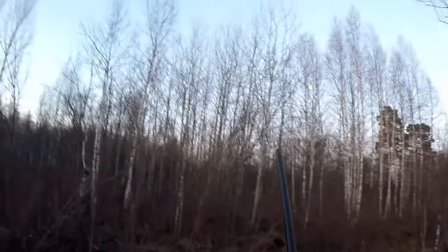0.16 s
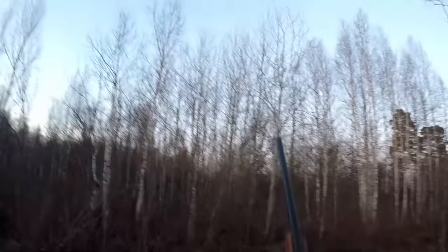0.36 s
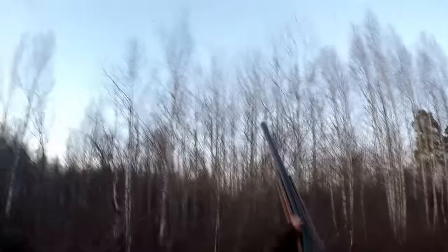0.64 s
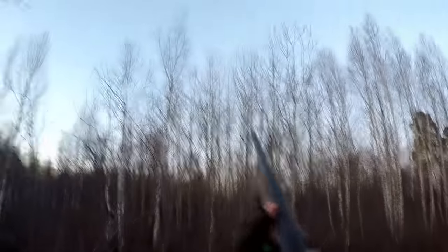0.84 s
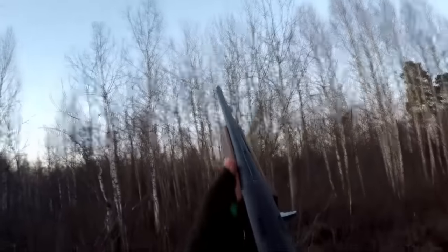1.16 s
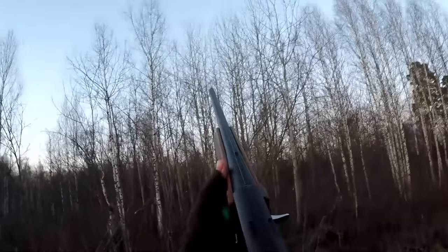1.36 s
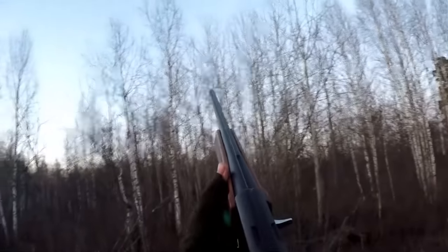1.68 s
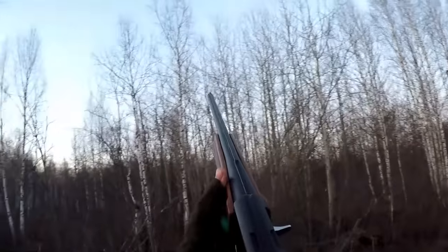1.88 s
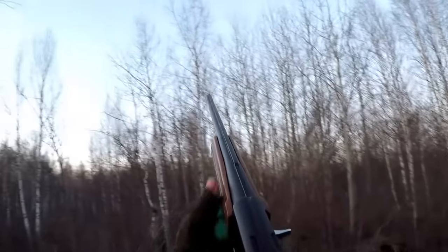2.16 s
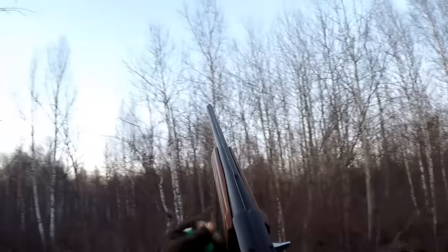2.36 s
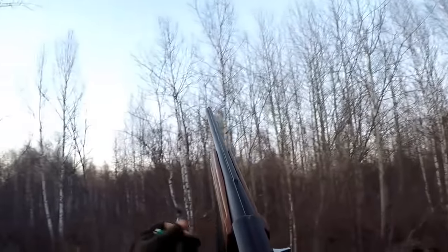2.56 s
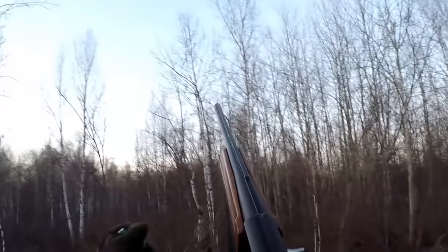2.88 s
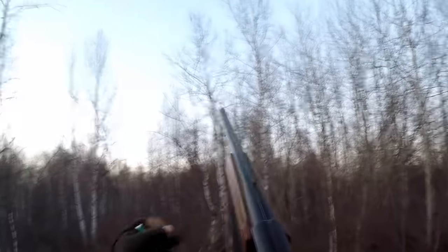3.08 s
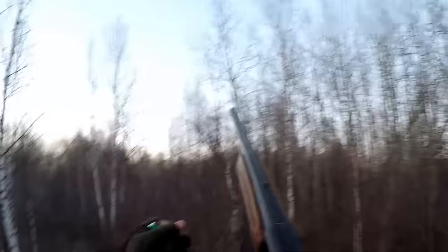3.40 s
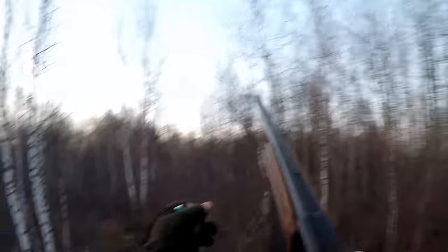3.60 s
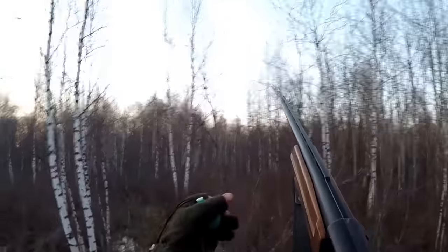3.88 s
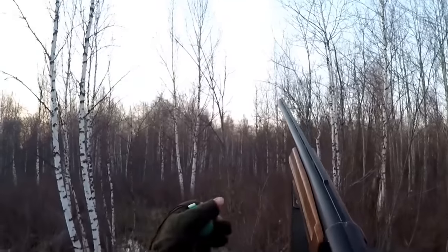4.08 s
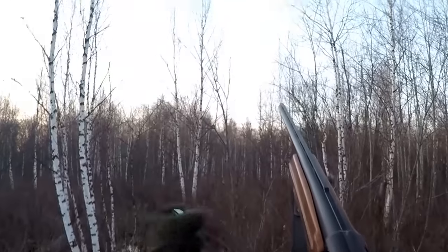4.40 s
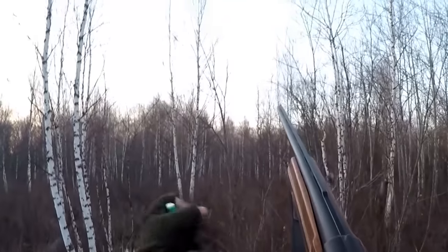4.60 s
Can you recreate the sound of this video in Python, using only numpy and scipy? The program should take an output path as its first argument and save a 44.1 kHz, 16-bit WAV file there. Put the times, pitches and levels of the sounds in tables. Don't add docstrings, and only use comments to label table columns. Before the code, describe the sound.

Close, body-worn microphone in an open birch wood at dusk. A hand-held caller stutters and squeaks downward right away, then a sleeve rustles, wooden stock knocks cluster, and small parts click. After a quieter stretch the caller gives two piercing rise-then-fall squeaks with airy hiss. A faint distant bird whistles and ticks over soft wind rumble.

```python
import sys
import numpy as np
from scipy import signal
from scipy.fft import rfft, irfft
from scipy.io import wavfile
from scipy.ndimage import uniform_filter1d

SR = 44100
rng = np.random.default_rng(int(sys.argv[2]) if len(sys.argv) > 2 else 0)


def store_wav(level_fs):
    pcm = np.round(np.clip(np.atleast_2d(level_fs), -1, 1) * 32767)
    wavfile.write(sys.argv[1], SR, pcm.T.astype(np.int16))


def attenuation_scalar(level_db):
    decades = np.asarray(level_db, float) / 20
    return 10 ** decades


N = 209430


def evened(x):
    return x / np.sqrt(np.mean(x ** 2) + 1e-20)


def add(mix, start_s, sound):
    part = mix[round(start_s * SR):][:len(sound)]
    part += sound[:len(part)]


def resonate(x, hz, width_hz):
    turn = np.exp(2j * np.pi * np.cumsum(hz * np.ones(len(x))) / SR)
    r = np.exp(-np.pi * width_hz / SR)
    return 2 * (turn * signal.lfilter([1 - r], [1, -r], x / turn)).real


def resonate_twice(x, hz, width_hz):
    return resonate(resonate(x, hz, width_hz), hz, width_hz)


def coloured(x, points, keep=False):
    f, db = np.transpose(points)
    hz = np.fft.rfftfreq(len(x), 1 / SR)
    gain = attenuation_scalar(np.interp(np.log(hz + 1), np.log(f + 1), db))
    out = irfft(rfft(x) * gain, len(x))
    return out if keep else evened(out)


def flutter(size, depth_db):
    wander = uniform_filter1d(uniform_filter1d(rng.standard_normal(N), size), size)
    return attenuation_scalar(depth_db * evened(wander))


def columns(rows):
    s, *cols = np.transpose(rows)
    t = np.arange(s[0], s[-1], 1 / SR)
    return s[0], [uniform_filter1d(np.interp(t, s, c), size=15, mode="nearest") for c in cols]


def along(points, hz):
    f, db = np.transpose(points)
    return np.interp(np.log(hz), np.log(f), db)


# f/Hz of fundamental, level/dB
THIRD_HARMONIC = [(1700, -30), (2200, -12), (2480, -1), (2630, -6), (2760, -13), (2900, -17), (3250, -24),
                  (4300, -29), (4700, -33), (5100, -40)]


def sweep(rows, second=None, over_db=0, top_db=0):
    s, (hz, db) = columns(rows)
    levels_db = [db]
    if second:
        third_db = db + along(THIRD_HARMONIC, hz)
        levels_db += [db + over_db + along(second, hz)]
        levels_db += [third_db + step_db for step_db in (0, -8, -7, -12)]
    turn = 2 * np.pi * np.cumsum(hz) / SR
    tone = np.zeros(len(hz))
    for k, level_db in enumerate(levels_db, 1):
        lift_db = top_db * np.clip((k * hz - 11800) / 2200, 0, 1)
        ceiling = np.clip((15400 - k * hz) / 500, 0, 1)
        tone += attenuation_scalar(level_db + lift_db) * np.sin(k * turn) * ceiling
    beat = 2 * np.pi * 3950 * np.arange(len(hz)) / SR
    below = attenuation_scalar(-21) * np.sin(turn - beat) + attenuation_scalar(-42) * np.sin(turn - 2 * beat)
    above = attenuation_scalar(-34) * np.sin(turn + beat) * np.clip((12150 - hz) / 300, 0, 1)
    skirt = attenuation_scalar(-29) * np.sin(turn) * evened(uniform_filter1d(rng.standard_normal(len(hz)), size=6))
    tone += attenuation_scalar(db) * (below + above + skirt) * np.clip((hz - 8500) / 2000, 0, 1)
    return s, np.sqrt(2) * tone * signal.windows.tukey(len(hz), 60 / len(hz))


def pips(rows):
    out = np.zeros(N)
    for s, length_s, from_hz, to_hz, db in rows:
        hz = np.geomspace(from_hz, to_hz, round(length_s * SR))
        tone = np.sqrt(2) * np.sin(2 * np.pi * np.cumsum(hz) / SR)
        add(out, s, attenuation_scalar(db) * tone * signal.windows.tukey(len(hz), .6))
    return out


# f/Hz, level/dB per Hz
FLOOR_SPECTRUM = [(12, -28.5), (20, 1.5), (118, -17), (136, -20), (206, -19.5), (257, -22.5), (448, -23.5),
                  (698, -26), (2060, -29.5), (2240, -29.5), (4010, -29.5), (15200, -44)]
# t/s, level/dB
WIND = [(0.0, -61), (0.33, -63), (0.48, -56), (0.75, -50), (0.85, -53), (1.48, -64), (1.81, -60.5),
        (2.01, -63), (2.34, -60.5), (2.68, -65), (2.97, -55), (3.09, -62), (3.53, -61), (3.91, -70.5),
        (4.1, -65.5), (4.31, -57), (4.75, -61.5)]


def air():
    floor = coloured(rng.standard_normal(N), FLOOR_SPECTRUM + [(15500, -76.0)])
    floor *= attenuation_scalar(-60.5) * flutter(size=900, depth_db=0.9)
    s, db = np.transpose(WIND)
    gusts = coloured(rng.standard_normal(N), [(15, 0), (40, -1.5), (100, -8), (220, -18.5), (600, -46.5)])
    gusts *= attenuation_scalar(np.interp(np.arange(N) / SR, s, db) - 1.0) * flutter(size=1500, depth_db=3.0)
    return floor + gusts


def woods(x):
    t = np.arange(round(.4 * SR)) / SR
    bright = signal.lfilter([1, -.6], [1], rng.standard_normal(len(t)))
    tail = bright * attenuation_scalar(-60 * t / .5) * (t > .004)
    return signal.oaconvolve(x, tail / np.linalg.norm(tail))[:N]


# t/s, length/s, from f/Hz, to f/Hz, level/dB
WHISTLES = [(.394, .011, 4500, 7200, -61), (.461, .015, 9000, 3700, -62), (.892, .012, 6500, 6000, -63),
            (2.026, .014, 5800, 7600, -70), (2.022, .012, 4300, 5300, -70), (3.918, .015, 4300, 7000, -65),
            (3.990, .013, 6800, 4200, -66), (1.808, .006, 4000, 4000, -65)]
# t/s, f/Hz, level/dB
ARCH = [(.06, 3450, -64), (.07, 3750, -52), (.078, 4050, -49), (.084, 4280, -48), (.092, 4050, -49),
        (.098, 3750, -50), (.103, 3300, -60)]
# t/s, relative level/dB, f/Hz
TICKS = [(1.1234, -59, 3620), (1.2994, -63, 4020), (1.5474, -61, 3620), (1.5754, -62, 3840),
         (1.7894, -59, 3850), (1.8744, -58, 3830), (2.2904, -61, 3790), (2.6584, -63, 3770),
         (3.3094, -60, 3820), (3.3914, -61, 3740), (3.4074, -61, 4000), (3.5144, -60, 3940),
         (3.5264, -60, 3910), (3.7094, -60, 4470), (3.7974, -60, 3630), (3.8921, -58, 3700),
         (3.9404, -62, 3800), (4.0304, -63, 3690), (4.1324, -62, 3690), (4.2334, -61, 3940)]


def far_bird():
    ticks = [(s, .011, .96 * hz, 1.04 * hz, db - 10) for s, db, hz in TICKS]
    out = pips(list(WHISTLES) + ticks)
    add(out, *sweep(ARCH))
    return out


# t/s, level/dB
RUSTLE = [(0.0, -61.5), (0.35, -68.5), (0.48, -56), (0.87, -58.5), (1.12, -66.5), (1.27, -80), (2.03, -69),
          (2.26, -73), (2.6, -84.5)]
# f/Hz, level/dB per Hz
CLOTH = [(88, -37.5), (150, -6.5), (347, 2), (1040, -5), (1260, -4.5), (1460, -6.5), (5480, -22),
         (9000, -32), (11700, -62), (19800, -120)]
# t/s, length/s, f/Hz,
# width/Hz, level/dB
NOISE_BANDS = [(.828, .022, 1250, 250, -57), (.915, .04, 1300, 400, -58), (.942, .062, 1220, 380, -53),
               (1.015, .03, 1170, 300, -60), (1.045, .025, 1150, 300, -61), (1.10, .03, 1150, 200, -65),
               (.55, .25, 1280, 250, -63), (.835, .04, 5800, 900, -63), (2.05, .08, 6100, 1500, -62),
               (2.05, .078, 13200, 1500, -76), (2.085, .08, 1000, 1800, -58), (3.68, .03, 1150, 400, -68),
               (.122, .016, 2500, 700, -52), (4.512, .022, 2400, 500, -48), (4.245, .03, 2500, 2000, -64),
               (0, .1, 280, 150, -54), (.098, .03, 9000, 7000, -48), (4.495, .025, 11000, 7000, -47),
               (2.99, .026, 11000, 7000, -48), (.22, .1, 7600, 1800, -60), (.21, .13, 6000, 1500, -53),
               (.29, .08, 14000, 2500, -65), (.16, .06, 14000, 2500, -68), (.308, .018, 2800, 2500, -56),
               (.35, .14, 3500, 4500, -59), (.748, .02, 250, 350, -46), (2.815, .13, 12200, 1000, -60),
               (4.315, .12, 12300, 1100, -57), (2.96, .07, 10500, 5000, -56), (4.46, .08, 13000, 5000, -58),
               (2.795, .04, 14800, 1800, -58), (4.29, .03, 14800, 1800, -54), (2.964, .025, 15300, 900, -58),
               (2.13, .035, 800, 900, -61), (2.133, .007, 3150, 500, -40), (3.0, .05, 12000, 5000, -56),
               (4.51, .05, 12500, 5000, -54), (.81, .02, 90, 100, -48), (.895, .02, 90, 100, -49),
               (.92, .15, 2300, 2200, -63)]
# t/s, length/s, f/Hz, width/Hz, level/dB
MORE_NOISE_BANDS = [(.755, .009, 2700, 350, -43), (.776, .008, 10500, 1500, -56), (.773, .006, 7500, 3000, -54),
                    (.93, .14, 1200, 300, -61), (2.088, .025, 2200, 3000, -60), (1.935, .02, 4000, 700, -63),
                    (4.287, .006, 1300, 900, -52), (.75, .018, 550, 500, -52), (1.923, .012, 350, 400, -58),
                    (.35, .04, 1800, 1500, -62), (.33, .025, 3000, 1500, -62), (4.52, .1, 2700, 200, -66),
                    (4.52, .13, 3850, 350, -62), (3.03, .12, 3900, 400, -64), (3.13, .08, 2700, 500, -66),
                    (0, .065, 3300, 700, -60), (.815, .008, 500, 500, -52), (2.97, .008, 1200, 2000, -60),
                    (4.513, .008, 900, 1500, -58)]


def sleeve():
    out = np.zeros(N)
    grains = rng.standard_normal(N) * flutter(size=60, depth_db=2.0) * flutter(size=700, depth_db=2.2)
    smooth = rng.standard_normal(N) * flutter(size=200, depth_db=1.5)
    s, (db,) = columns(RUSTLE)
    cloth = coloured(grains[round(s * SR):][:len(db)], CLOTH)
    bright = attenuation_scalar(-9.5) * resonate(cloth, 3500, 4500)
    add(out, s, attenuation_scalar(db) * (cloth + bright))
    for s, length_s, hz, width_hz, db in list(NOISE_BANDS) + list(MORE_NOISE_BANDS):
        rub = smooth[round(s * SR):][:round(length_s * SR)]
        rub = evened(resonate_twice(rub, hz, width_hz))
        add(out, s, attenuation_scalar(db) * rub * signal.windows.tukey(len(rub), .7))
    return out


# t/s, level/dB, favoured f/Hz, rise/s, damping factor of the hand
KNOCKS = [(.302, -43, 1800, .001, 1.3), (.307, -36, 420, .002, 1), (.3142, -26, 1100, .004, .9),
          (.3315, -35, 450, .002, 1), (.336, -40, 1750, .002, 1), (.339, -33, 780, .003, 1),
          (.3455, -37, 480, .002, 1), (.3945, -44, 1100, .001, 2), (.405, -43, 1250, .001, 1.5),
          (.417, -49, 800, .001, 2), (.428, -51, 1050, .001, 2)]
# f/Hz, level/dB, t60/s
STOCK_MODES = [(416, -3, .08), (500, -7, .16), (829, -7, .09), (1090, 3, .055), (1440, -9, .03),
               (1550, -8, .035), (1910, -9, .04), (2490, -14, .025)]


def stock():
    out, t = np.zeros(N), np.arange(4000) / SR
    favour_db_per_octave = -7
    for s, db, best_hz, rise_s, damping in KNOCKS:
        ring = np.zeros(len(t))
        for k, (hz, mode_db, t60_s) in enumerate(STOCK_MODES):
            level_db = mode_db + favour_db_per_octave * abs(np.log2(hz / best_hz))
            decay_db = -60 * damping * t / t60_s
            ring += (-1) ** k * attenuation_scalar(level_db + decay_db) * np.sin(2 * np.pi * hz * t)
        rise = np.sin(np.pi / 2 * np.minimum(t / rise_s, 1)) ** 2
        add(out, s, attenuation_scalar(db) * ring * rise)
    return out


# t/s, peak level/dB, main ring f/Hz, low ring level/dB, high snap level/dB
CLICKS = [(0.746, -46, 3600, 2, -2), (0.756, -39, 1900, -10, -30), (0.7562, -33, 2600, -15, -14),
          (0.775, -42, 2500, -30, 6), (0.794, -50, 3500, -20, -20), (0.779, -35, 2900, -12, -5),
          (0.7795, -37, 1900, -12, -20), (0.816, -55, 2720, -20, -2), (0.9448, -40, 1270, -10, -20),
          (0.9455, -52, 3500, -20, -10), (0.971, -57, 2870, -1, -30), (1.036, -53, 2370, -6, -22),
          (1.189, -51, 2750, -23, -25), (1.411, -53, 3060, -23, -10), (1.449, -53, 4000, -29, -31),
          (1.891, -52.5, 3510, -1, -20), (1.921, -45, 2900, -6, -30), (1.9265, -46, 4500, -30, -20),
          (1.9277, -46, 2100, 8, -30), (1.9285, -45, 900, 0, -40), (2.011, -56, 2680, -18, -14),
          (2.038, -56.5, 2890, -16.5, -7), (2.133, -35, 3150, -9, -14), (2.1338, -33, 3100, -7, -18),
          (2.4306, -50, 1700, 9, -5), (2.4312, -47, 900, -5, -30)]


def clicks():
    out, t = np.zeros(N), np.arange(900) / SR
    for s, db, main_hz, low_db, high_db in CLICKS:
        chatter = rng.standard_normal(len(t)) * (attenuation_scalar(-60 * t / .01) + .1 * attenuation_scalar(-60 * t / .04))
        click = np.zeros(len(t))
        for hz, width_hz, mode_db in [(main_hz, 1400, 0), (1000, 1100, low_db), (5600, 2300, high_db)]:
            drive = chatter * attenuation_scalar(-60 * t / .006) if hz == 1000 else chatter
            ring = resonate_twice(drive, hz, width_hz)
            click += attenuation_scalar(mode_db) * ring / abs(ring).max()
        add(out, s, attenuation_scalar(db) * click)
    return out


# start t/s, end t/s, level/dB, resonance f/Hz, top band
# level/dB
HISS_SPANS = [(-.05, .11, -55, 3850, -19.5), (.11, .40, -54, 5100, -18), (2.78, 3.0, -55, 4720, -17),
              (3.0, 3.25, -53.5, 5350, -20), (4.28, 4.505, -53.5, 5040, -8), (4.505, 4.80, -56, 5450, -12)]
SHARP_RING = (.5, .1, 1.25, .6, 1.2, .65)
WIDE_RING = (.3, .45, .35, .75, .5, .6)
UPPER_DB = (-13, -21)
TOP_DB_PER_S = (-20, 30)


def hiss():
    out = np.zeros(N)
    burst_db, burst_s, sag_db_per_s, release_s, drift_hz_per_s = 15.5, .03, 6, .051, 1500
    upper_burst_db, upper_burst_s = 13, .06
    sharp_fade_s, blur_hz, blur_lift_hz = .4, 1000, 200
    for k, (s, end_s, level_db, centre_hz, top_db) in enumerate(HISS_SPANS):
        falling = k % 2
        t = np.arange(max(-s, 0), end_s - s, 1 / SR)
        held = attenuation_scalar(level_db - sag_db_per_s * t)
        if falling:
            held = held * np.clip((t[-1] - t) / release_s, 0, 1)
        burst = attenuation_scalar(burst_db * np.exp(-t / burst_s))
        hz = centre_hz + drift_hz_per_s * t
        noise = rng.standard_normal((4, len(t)))
        sharp = evened(resonate_twice(noise[0], hz, 480))
        blurred = evened(resonate_twice(noise[0][::-1], hz + blur_lift_hz, blur_hz))
        core = SHARP_RING[k] * np.exp(-t / sharp_fade_s) * sharp + WIDE_RING[k] * blurred
        broad = coloured(resonate(noise[1], hz - 300, 2600), [(1600, -25), (2500, 0), (7000, 0), (9500, -18)])
        upper = coloured(noise[2], [(7000, -30), (8500, 0), (12000, 0), (13000, -30)])
        top = coloured(noise[3], [(10000, -30), (11800, -9), (12700, 0), (15200, -4), (15500, -50)])
        upper_db = UPPER_DB[falling] + upper_burst_db * np.exp(-t / upper_burst_s)
        bright = attenuation_scalar(upper_db) * upper + attenuation_scalar(top_db + TOP_DB_PER_S[falling] * t) * top
        add(out, max(s, 0), held * (burst * (.65 * broad + core) + bright))
    return out * flutter(size=400, depth_db=1.3)


# t/s, length/s, from f/Hz, to f/Hz, level/dB
STRAYS = [(0, .016, 14600, 14600, -52), (0, .008, 4300, 4300, -52), (0, .008, 13400, 13400, -52),
          (.105, .005, 3600, 3200, -36), (2.985, .052, 2650, 2580, -49), (3.013, .026, 2290, 2250, -43),
          (2.990, .006, 4650, 4550, -35), (3.0005, .005, 1600, 1200, -44), (4.497, .008, 4450, 4850, -40),
          (4.503, .005, 1500, 1800, -42), (4.5048, .0044, 5750, 5500, -20),
          (4.5032, .0024, 4780, 4650, -16), (2.9996, .002, 4800, 4700, -23),
          (3.0012, .003, 5450, 5600, -24), (3.0115, .005, 2700, 2540, -32), (4.2825, .006, 5600, 5750, -33),
          (4.515, .005, 2750, 2600, -37)]


def stray_tones():
    return pips(STRAYS)


# t/s, f/Hz, level/dB
STUTTER = [(.04, 14810, -65), (.046, 14940, -39), (.053, 14550, -60), (.06, 13930, -37), (.067, 13510, -47),
           (.074, 12940, -62), (.079, 12300, -66), (.084, 11750, -36), (.089, 11450, -56),
           (.092, 11000, -70)]
# t/s, f/Hz, level/dB
RISES = [
    [(2.7752, 2250, -48), (2.7768, 2740, -20), (2.779, 2990, -19.5), (2.7845, 4080, -9),
     (2.7862, 4400, -9.5), (2.7876, 5180, -5.5), (2.7884, 5150, -8), (2.7892, 5000, -14)],
    [(4.2755, 1650, -58), (4.2778, 1950, -42), (4.279, 2350, -33), (4.28, 2700, -21), (4.282, 2930, -21),
     (4.283, 3380, -19), (4.285, 3850, -19), (4.287, 4170, -15), (4.288, 4450, -13.5), (4.2893, 5180, -5),
     (4.2907, 5200, -5.5)],
]
# t/s, f/Hz, level/dB
CATCHES = [
    [(2.7905, 4720, -20), (2.7927, 4500, -25), (2.7955, 4800, -11.5), (2.7983, 5060, -7.5),
     (2.7992, 5100, -10.5), (2.8025, 4900, -48)],
    [(4.293, 4820, -16), (4.295, 4600, -19), (4.297, 4840, -10.5), (4.298, 4960, -7), (4.299, 5070, -6.5),
     (4.3002, 5200, -8.5), (4.302, 5080, -27), (4.3045, 5080, -50)],
]
# t/s, f/Hz, level/dB
RISES_HIGH = [
    [(2.7883, 7530, -24), (2.791, 8300, -22.5), (2.7935, 9250, -27), (2.796, 9600, -28.5),
     (2.8, 10720, -28), (2.805, 11480, -26), (2.811, 12020, -24.6), (2.838, 12820, -32.5),
     (2.843, 12510, -63)],
    [(4.2905, 7750, -42), (4.293, 8500, -34), (4.296, 9550, -34), (4.3, 10650, -36), (4.304, 11450, -27.5),
     (4.309, 12120, -23), (4.32, 12440, -26.7), (4.334, 12830, -30.6), (4.339, 12540, -52)],
]
# overtone peak pitch factor, top overtones/dB, difference tone/dB, sum tone/dB
RISE_COLOUR = [
    (1, 0, 9, 3),
    (1.02, 14, 22, 23),
]
# t/s, f/Hz, level/dB
GLIDES = [
    [(.0972, 9900, -55), (.0988, 9300, -23.5), (.1025, 8150, -25.5), (.104, 7700, -20), (.106, 7150, -14.5),
     (.110, 5780, -14), (.112, 5080, -9), (.1133, 4950, -12)],
    [(2.959, 12330, -53.6), (2.963, 12110, -24.4), (2.98, 11540, -21), (2.986, 10670, -22.4),
     (2.992, 9250, -24.2), (2.997, 7490, -20), (3.0005, 6290, -12.1), (3.0009, 5900, -13.9)],
    [(4.449, 12620, -54.1), (4.453, 12560, -27), (4.482, 11720, -20), (4.488, 11070, -24.5),
     (4.493, 10000, -27.8), (4.498, 8550, -30.8), (4.502, 7190, -24), (4.5035, 6720, -15),
     (4.5049, 5900, -14)],
]
# t/s from the slide, f/Hz, level/dB
SLIDE = [(0, 4300, -16), (.001, 3600, -8), (.0023, 3120, -13), (.0043, 2880, -18), (.0063, 2730, -24),
         (.0093, 2600, -31), (.0103, 2490, -35), (.0113, 2340, -38), (.013, 2200, -55)]
# t/s from the snap, f/Hz, level/dB
DROP = [(0, 4350, -4), (.0007, 4050, -8), (.0027, 3450, -15), (.0047, 3100, -15), (.0067, 2710, -20.5),
        (.0097, 2620, -29), (.0112, 2550, -38), (.0127, 2390, -47), (.014, 2220, -56)]
# t/s from the snap, f/Hz, level/dB
LAST_DROP = [(0, 4400, -3), (.0007, 4050, -9), (.0032, 3450, -19), (.0047, 3140, -19), (.0062, 2800, -18),
             (.0087, 2680, -26), (.0107, 2610, -35), (.0122, 2500, -46), (.0138, 2300, -62)]
# t/s, level/dB, overtones/dB, top overtones/dB
DROPS = [
    (.1137, 0, -2, -12),
    (3.0013, 0, 0, 1),
    (4.5053, 0, 4, 3),
]
# f/Hz of fundamental, level/dB
SECOND_RISING = [(1700, -30), (2100, -14), (2500, 1), (2800, 6.5), (3200, 1), (3800, -12), (4370, -19),
                 (4750, -32), (5100, -30)]
# f/Hz of fundamental, level/dB
SECOND_FALLING = [(2200, 12), (2450, 19), (2600, 15), (2730, 9.5), (3230, -1.5), (3900, -19), (4300, -27),
                  (6300, -28), (7200, -17), (7700, -28)]


def squeaks():
    both = np.zeros(N)
    add(both, *sweep(STUTTER))
    for climb, catch, upper, colour in zip(RISES, CATCHES, RISES_HIGH, RISE_COLOUR):
        factor, top_db, below_db, sum_db = colour
        second = [(factor * hz, db) for hz, db in SECOND_RISING]
        s, low = sweep(climb + catch, second, top_db=top_db)
        high_s, high = sweep(upper)
        add(both, s, low)
        add(both, high_s, high)
        overlap = low[round(high_s * SR) - round(s * SR):]
        product = overlap * high[:len(overlap)]
        horn = [(1500, below_db - 30), (2600, below_db - 3), (3600, below_db + 3), (7000, below_db),
                (11000, sum_db), (14900, sum_db), (15600, sum_db - 30)]
        add(both, high_s, coloured(product, horn, keep=True))
    for glide, ending, (s, level_db, over_db, top_db) in zip(GLIDES, (SLIDE, DROP, LAST_DROP), DROPS):
        drop = [(s + t, hz, db + level_db) for t, hz, db in ending]
        add(both, *sweep(list(glide) + drop, SECOND_FALLING, over_db, top_db))
    loud = both * abs(both)
    smear = signal.lfilter([1, -.8], [1], loud * rng.standard_normal(N))
    thud = resonate(both ** 2, 1200, 800)
    return both + attenuation_scalar(-25) * smear + attenuation_scalar(-39.5) * thud


def scene():
    calls = far_bird() + stray_tones() + squeaks()
    handling = sleeve() + stock() + clicks()
    mix = air() + attenuation_scalar(-37.0) * woods(calls) + handling + hiss() + calls
    return mix[None]


def low_pass(x):
    return signal.sosfilt(signal.butter(12, 16520, fs=SR, output="sos"), x)


def record(dry):
    dull = signal.oaconvolve(dry, signal.firwin(255, 15800, fs=SR)[None], "same")
    return low_pass(dull)


dry = scene()
out = record(dry)
store_wav(out)
```